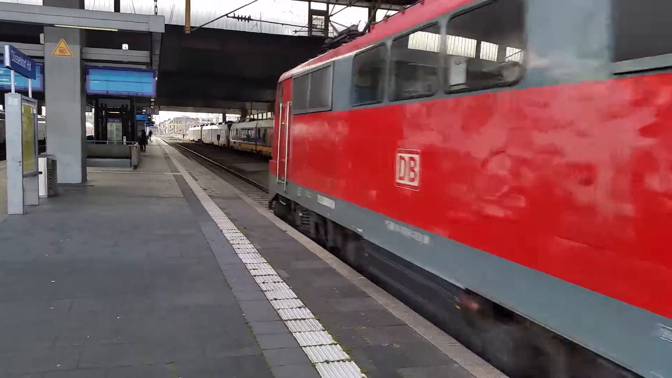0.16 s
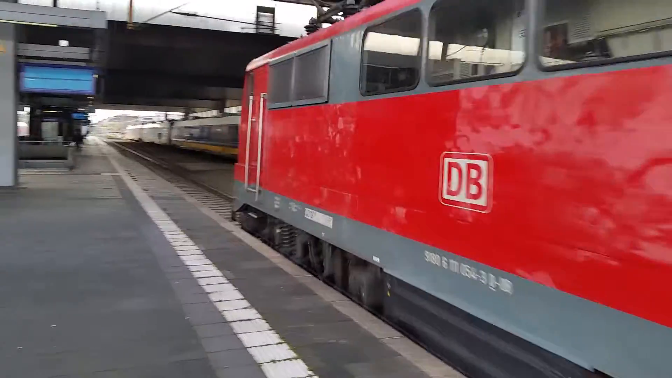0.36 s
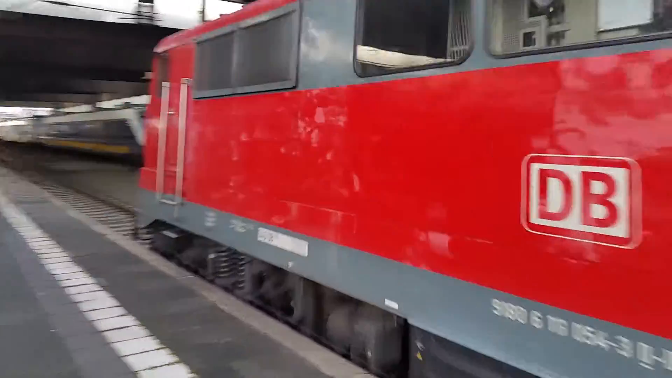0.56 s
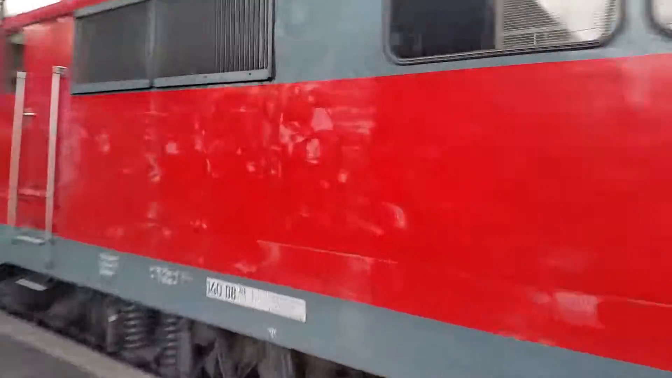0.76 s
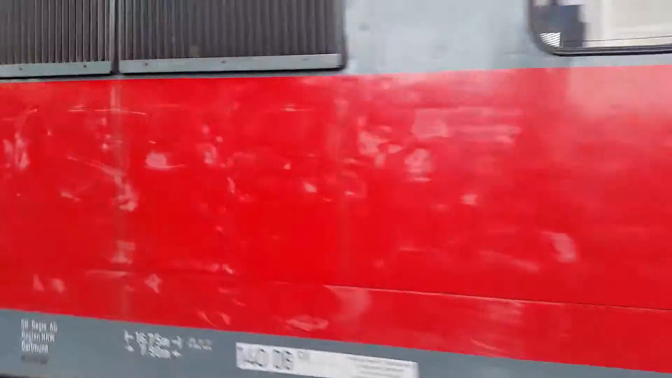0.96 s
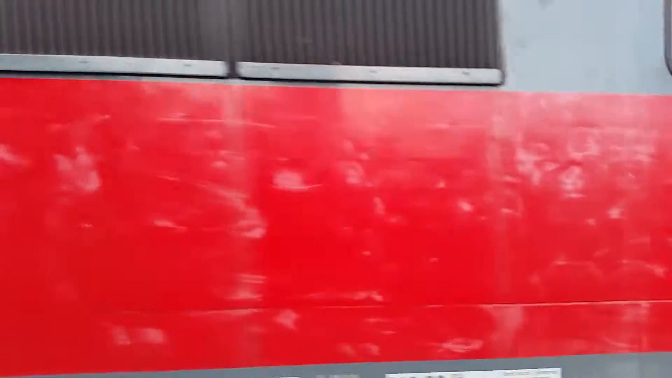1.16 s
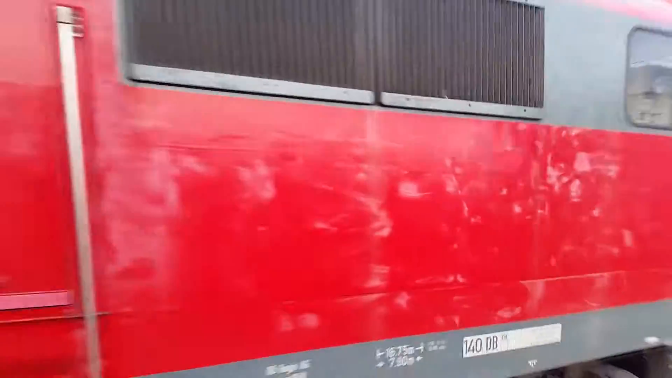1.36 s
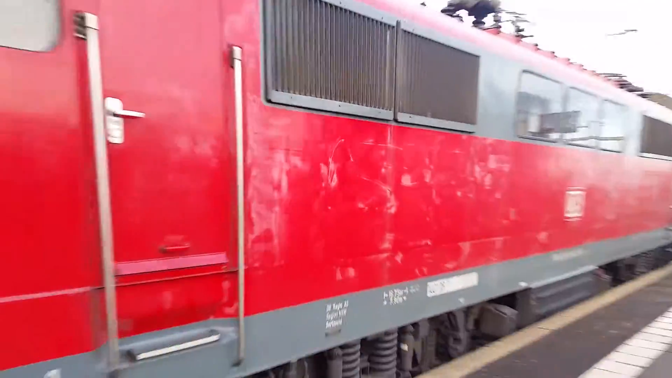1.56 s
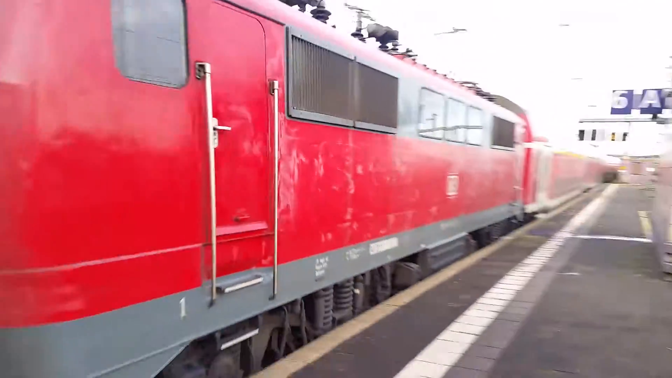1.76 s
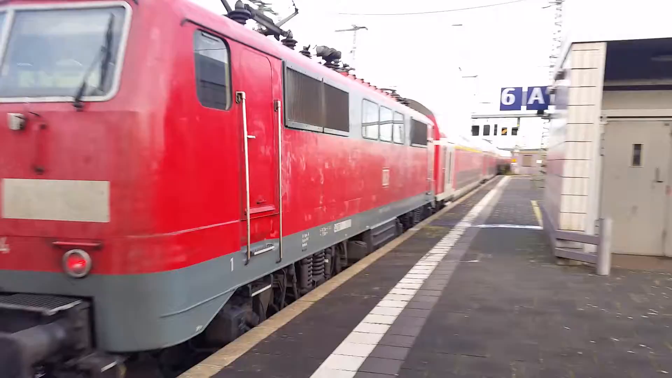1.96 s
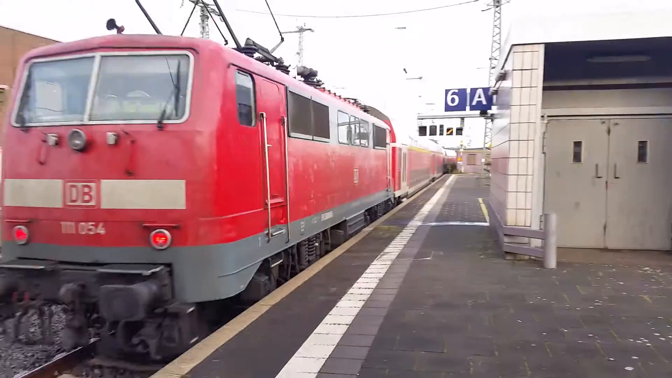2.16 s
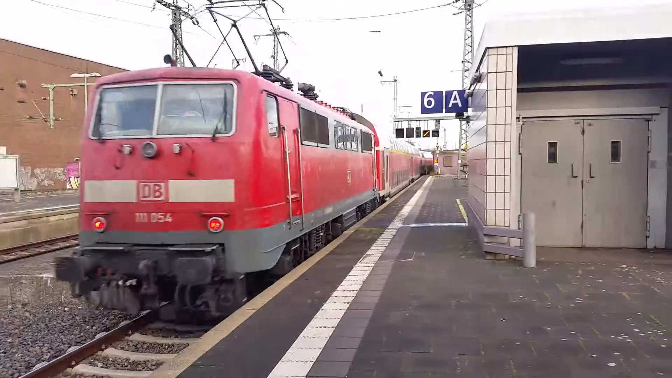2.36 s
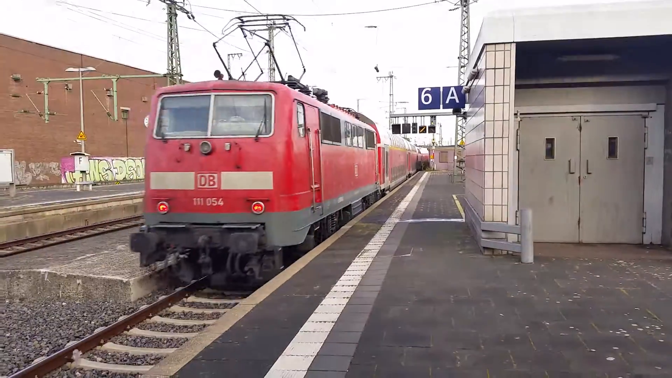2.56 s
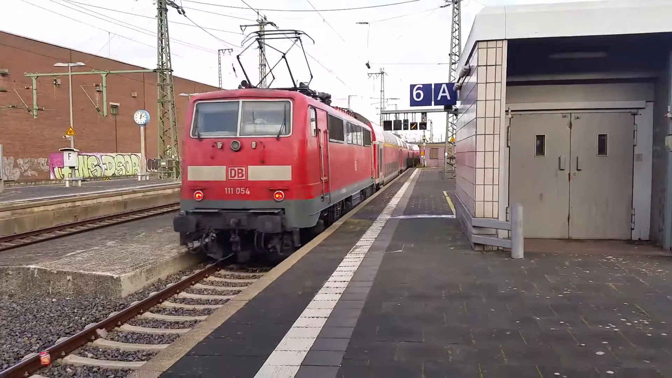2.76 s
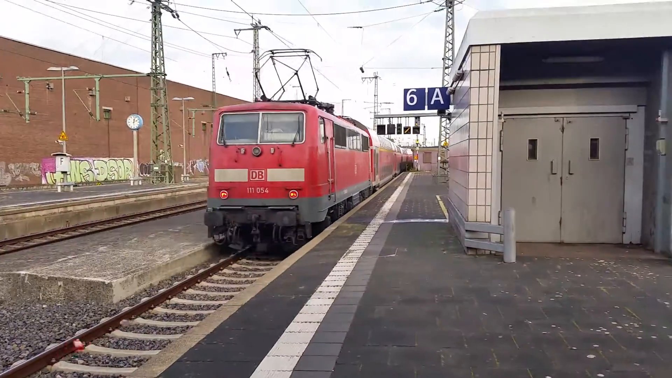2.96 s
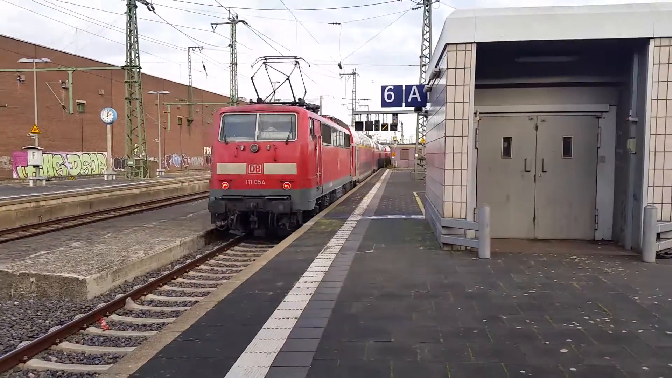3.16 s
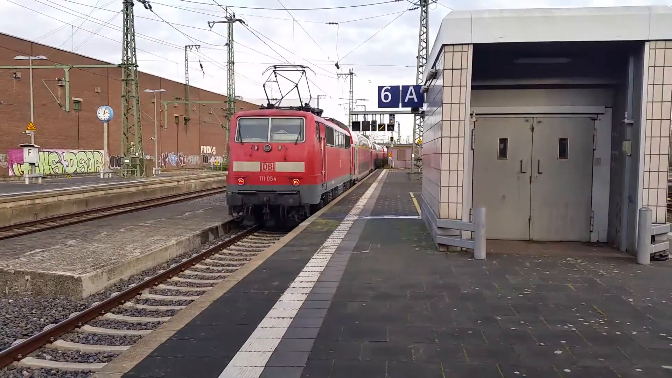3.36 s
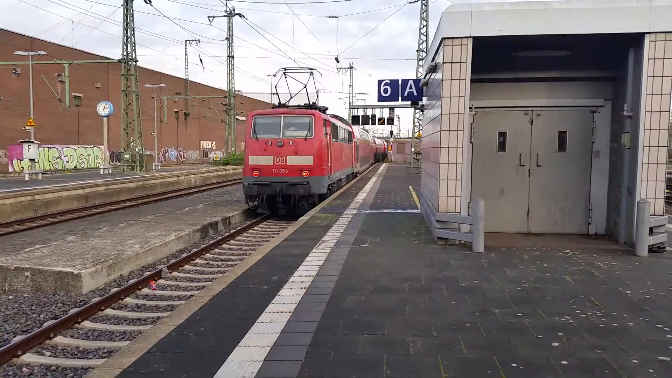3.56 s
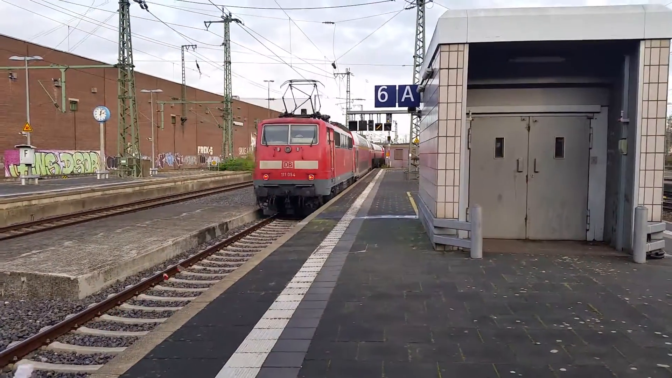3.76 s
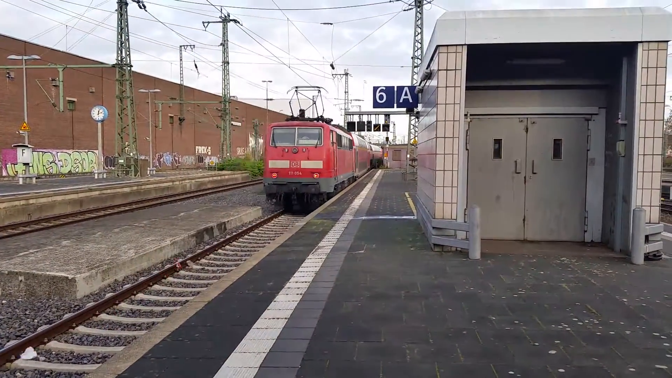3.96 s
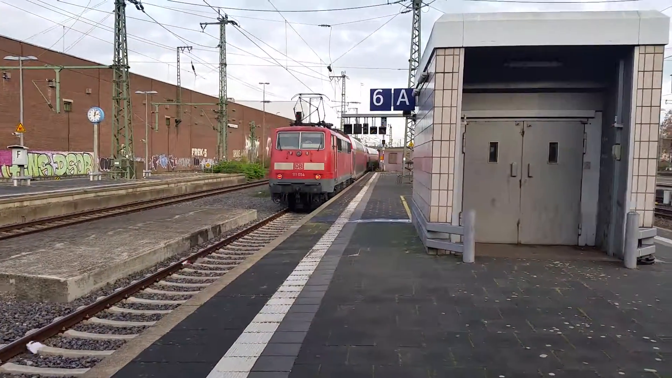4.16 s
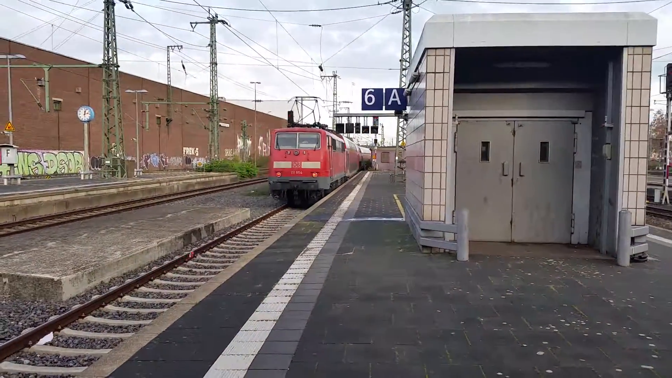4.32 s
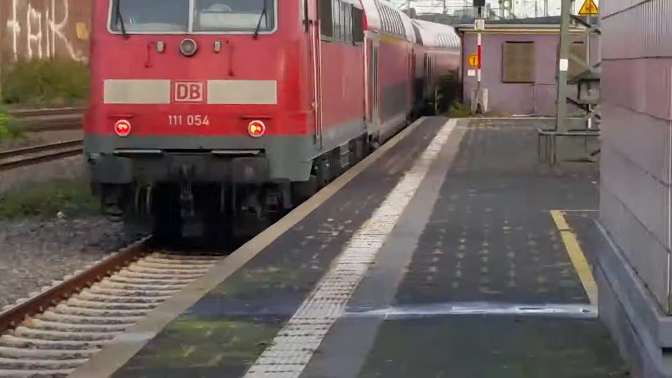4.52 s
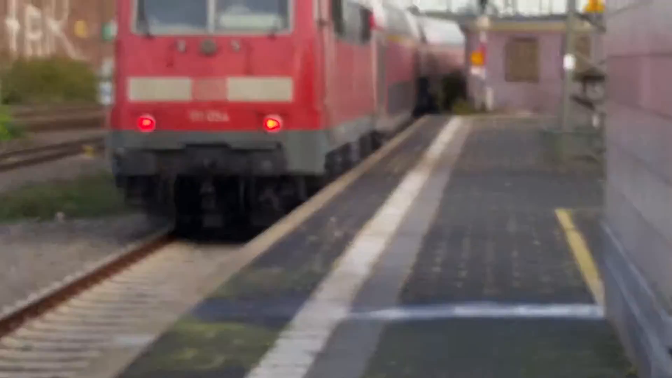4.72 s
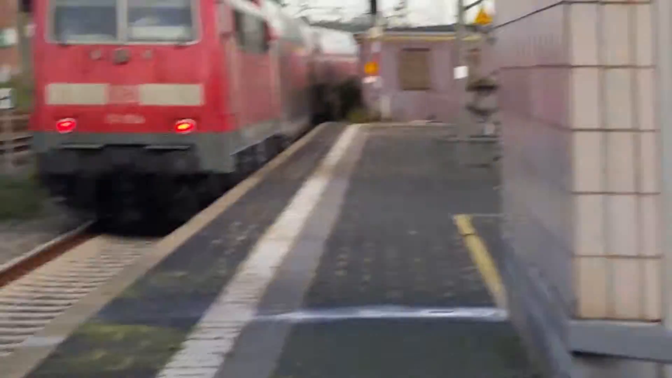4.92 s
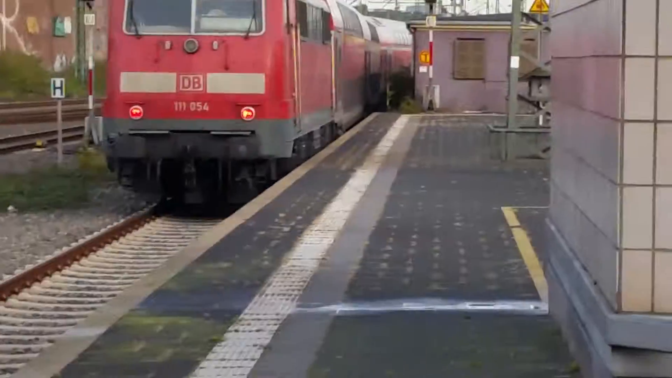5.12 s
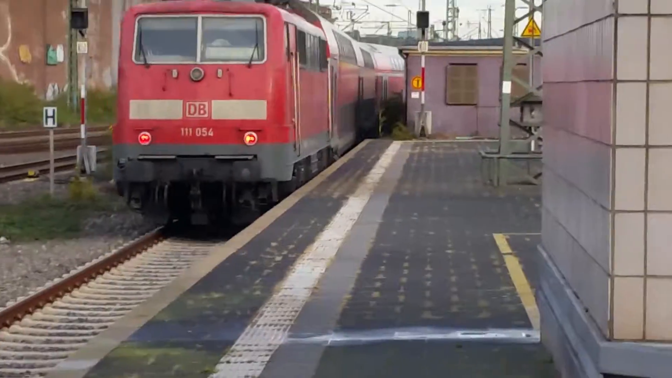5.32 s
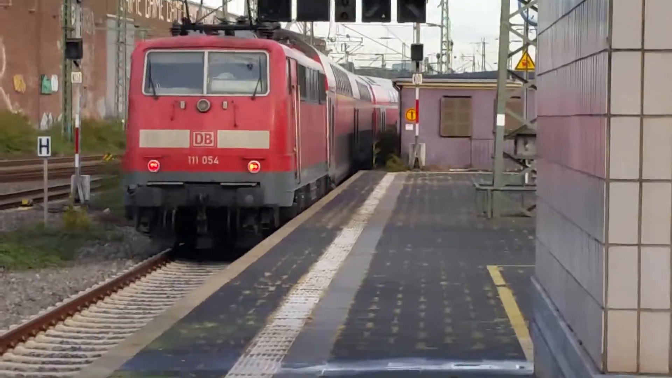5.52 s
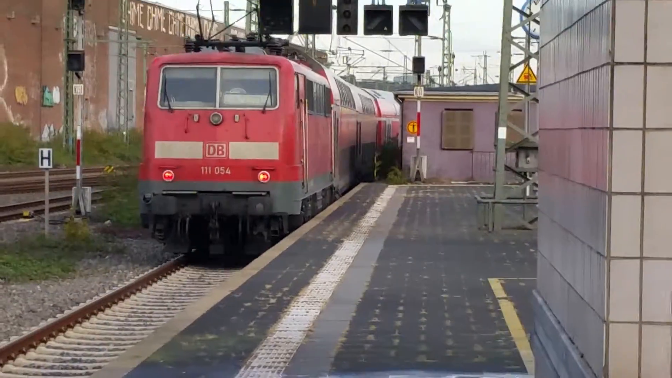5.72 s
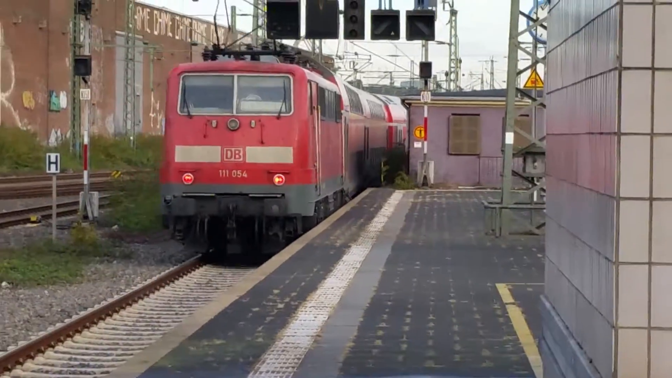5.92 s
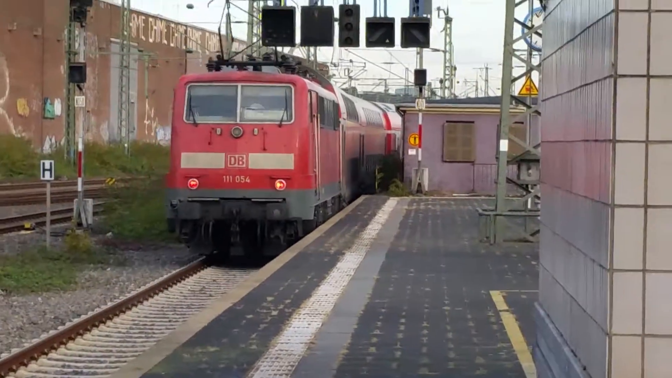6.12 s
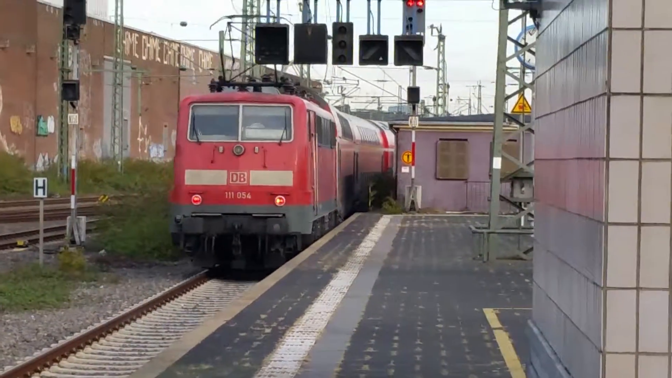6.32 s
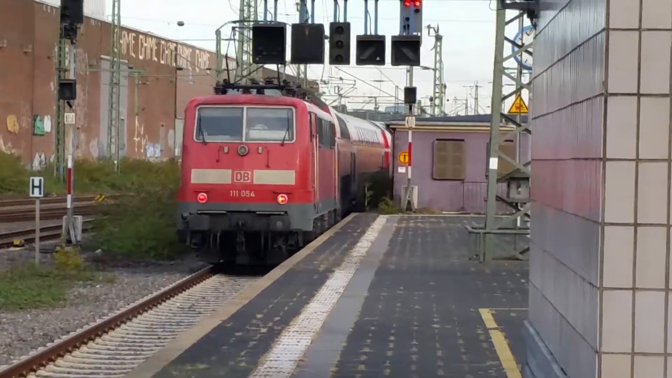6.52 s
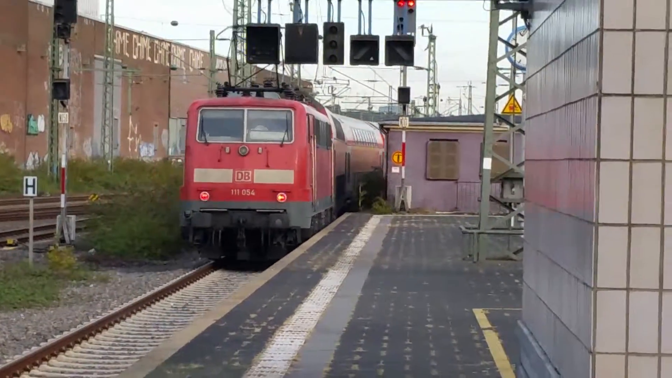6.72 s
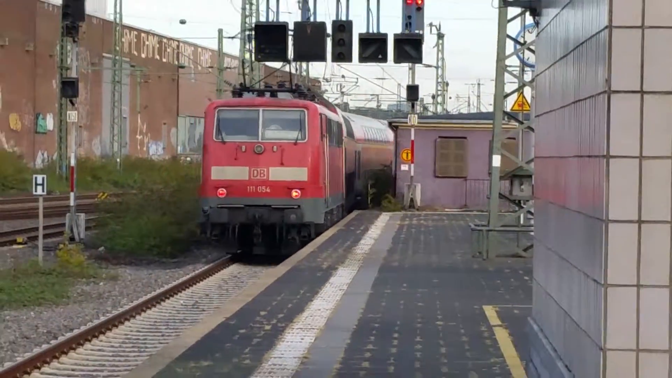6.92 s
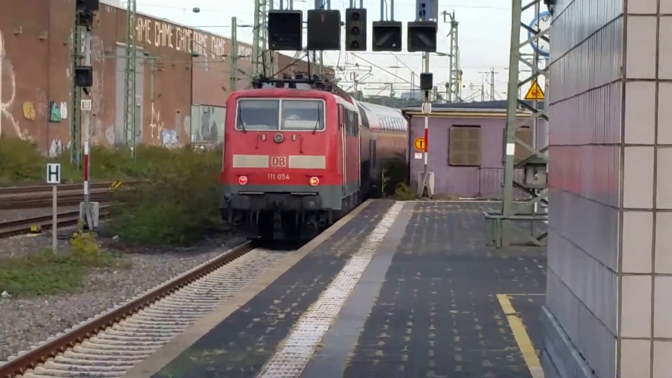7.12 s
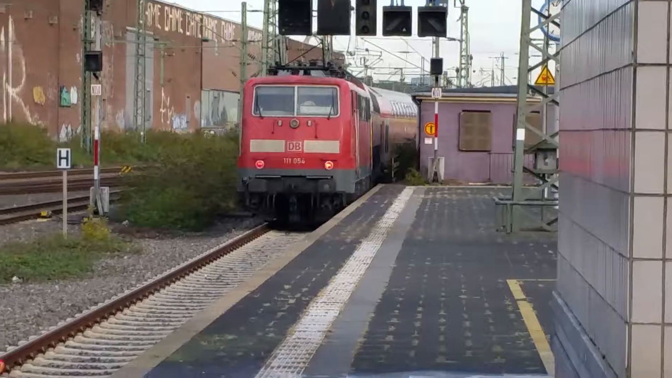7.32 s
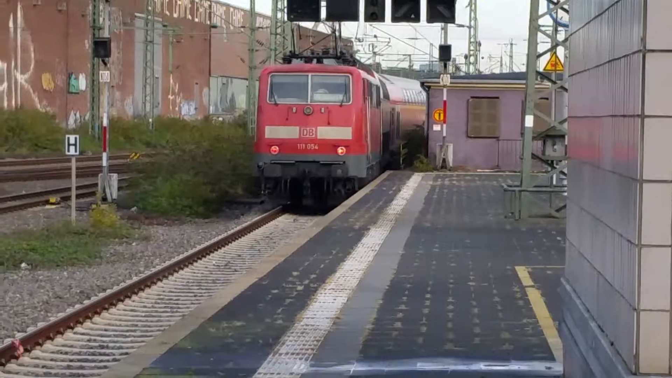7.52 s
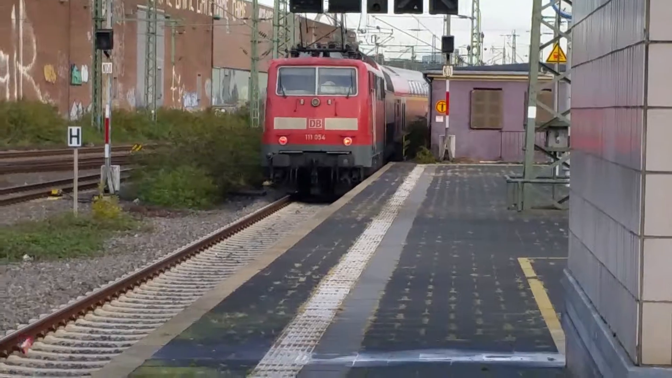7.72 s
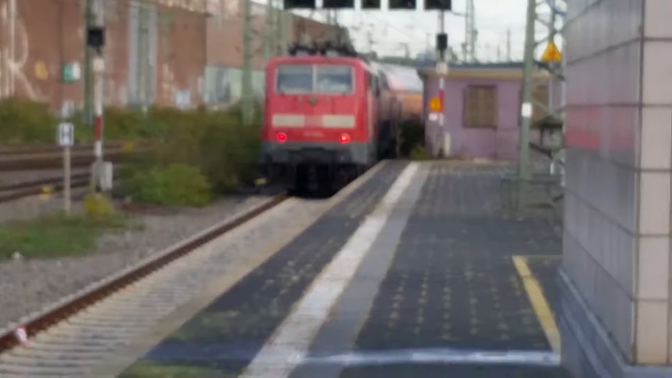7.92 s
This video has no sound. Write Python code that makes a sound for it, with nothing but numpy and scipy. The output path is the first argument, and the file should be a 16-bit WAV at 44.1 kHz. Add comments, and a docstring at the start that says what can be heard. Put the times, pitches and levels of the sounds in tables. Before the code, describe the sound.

An electric locomotive passes right beside a hand-held phone on a station platform. For the first two seconds it is loud: droning blowers, slightly sinking gear tones and rushing air over a low motor hum and wheel roar, with a double thump near 1 second. From about 2 seconds the train draws away and the roar gradually fades. A thin sizzle of wheels against rail peaks near 3 seconds, with faint high crackles, soft metallic ringing and a run of low wheel jolts between 2.7 and 4.4 seconds. The phone takes a light knock at 4.3 seconds and a sharp, loud one near 5 seconds, after which the train is quiet and muffled for about a second. Around 6 seconds, with a soft bump, the distant rumble returns, joined by a faint high electric whine until the end at about 8 seconds.

```python
"""An electric locomotive pushes its train along a platform, an arm's length from a hand-held phone.
First its gears and blowers go by in a rush of noise, over a motor hum and the roar of rough wheels shaking
bogies, rails and wheel discs, mirrored by the platform. As it recedes, faint crackles dot the treble,
flanges sizzle, wheels jolt and ring. Near 5 s the phone takes a sharp knock, and the train is quiet and
dull for a second. It comes back far off, with the electrics whining."""
import sys
import numpy as np
from scipy import signal
from scipy.fft import rfft, irfft, next_fast_len
from scipy.io import wavfile
from scipy.ndimage import uniform_filter1d, map_coordinates

SR = 44100
rng = np.random.default_rng(int(sys.argv[2]) if len(sys.argv) > 2 else 0)


def unload_wav(signal):
    """Save mono or channel-first audio to the path in sys.argv[1] as 16-bit WAV at rate SR, clipped to [-1, 1]."""
    wavfile.write(
        sys.argv[1],
        SR,
        np.round(np.clip(np.atleast_2d(signal).T, -1, 1) * 32767).astype(np.int16),
    )


N = 356328
TIME = np.arange(N) / SR
SIZE = next_fast_len(N, True)
FREQ = np.maximum(np.arange(SIZE // 2 + 1) * SR / SIZE, 1)
PAN = np.array([[.5], [-.5]])  # splits a left-minus-right difference between the channels

# stereo width of the train: (frequency [Hz], diffuse minus direct [dB])
STEREO_WIDTH = [(30, -7), (70, -25), (140, -17.5), (260, -21), (500, -10), (700, -13), (1030, -6.5),
                (1350, 0), (1900, -1), (2400, -5), (3000, -0.5), (15000, -3)]


def undb(db):
    """Decibels to gain."""
    return 10 ** (np.asarray(db) / 20)


def unit(x):
    """Scale to rms 1."""
    return x / np.sqrt(np.mean(x ** 2))


def curves(rows):
    """Envelopes from rows of (time [s], values), joined by straight lines."""
    s, *columns = np.transpose(rows)
    return [np.interp(TIME, s, c) for c in columns]


def colour(points):
    """An EQ curve through points of (frequency [Hz], level [dB])."""
    hz, db = np.transpose(points)
    return undb(np.interp(np.log(FREQ), np.log(hz), db))


def wave(spectrum):
    """A spectrum as a waveform."""
    return irfft(spectrum, SIZE)[..., :N]


def below(hz, order=16):
    """Low-pass gain at every frequency."""
    return 1 / np.sqrt(1 + (FREQ / hz) ** order)


def walk(rate_hz):
    """Smooth random modulation at rms 1: sample and hold, slewed twice."""
    hold = int(SR / rate_hz)
    held = rng.standard_normal(2000)[np.arange(N) // hold]
    return unit(uniform_filter1d(uniform_filter1d(held, hold), hold))


def swell(s, spread_s, order=2):
    """A bell-shaped envelope, 1 at its top; a higher order flattens the top."""
    return np.exp(-.5 * np.abs((TIME - s) / spread_s) ** order)


def add(out, s, sound):
    """Mix a sound in at time s."""
    i = int(s * SR)
    out[..., i:i + sound.shape[-1]] += sound[..., :N - i]


def ring(modes):
    """Decaying sines after a blow, peak 1."""
    t = TIME[:SR // 4]
    y = sum(undb(db - 60 * t / t60) * np.sin(2 * np.pi * hz * t) for hz, db, t60 in modes)
    return y / np.abs(y).max()


def tone(hz, db, waver, flutter_db=2):
    """A sine that flutters in level and wavers by a share of its pitch."""
    pitch = hz * (1 + waver * walk(30))
    return undb(db + flutter_db * walk(16)) * np.sin(2 * np.pi * np.cumsum(pitch) / SR)


def ports():
    """Each microphone port favours its own bands, and hears them earlier or later than the other."""
    # balance of the ports: (frequency [Hz], left minus right [dB])
    balance = [(100, 1.5), (260, 1.5), (440, -1), (610, 6), (1000, 0.5), (1450, 1.5), (1800, 1), (2200, -2),
               (3100, -7), (5200, -2.5), (7200, -2), (8600, -4), (11500, 6.5), (16000, 5)]
    # phase between the ports: (frequency [Hz], left lead [rad])
    phase_lead = [(100, -0.13), (300, -0.01), (500, 0.27), (700, -0.05), (1000, .5), (1200, 0.5),
                  (1400, 1.7), (1700, -0.53), (2000, -1), (2400, 0), (2800, 1.4), (3400, 2.5), (6500, 5)]
    lead = np.interp(FREQ, *np.transpose(phase_lead))
    return np.exp((np.log(colour(balance)) + 1j * lead) * PAN)


def noise_band(hz, width_hz):
    """A band of noise at rms 1 with the train's stereo width; its centre may glide."""
    a, b = wave(rfft(rng.standard_normal((2, 2, N)), SIZE) / (1 + (2 * FREQ / width_hz) ** 4))
    phase = 2 * np.pi * np.cumsum(hz * np.ones(N)) / SR
    mid, side = rfft(a * np.cos(phase) + b * np.sin(phase), SIZE)
    diffuse = side * colour(STEREO_WIDTH)
    return unit(wave(np.array([mid + diffuse, mid - diffuse]) * ports()))


def decades(abreast_s=0.73, speed_m_s=10.58, reach_m=16.07):
    """The locomotive's distance in powers of ten of the reach beyond which its noise thins out."""
    return np.log10(np.hypot(1, speed_m_s * (TIME - abreast_s) / reach_m))


def whine(s=7.22, spread_s=0.95, base_hz=165.75):
    """Far off, the traction electrics whine on a few high multiples of one steady pitch."""
    # partials of the whine: (multiple of the base pitch)
    multiples = (16, 18, 19, 20, 21, 25)
    # strength of each partial: (level [dB])
    levels = [-61, -62, -52.5, -66, -58, -66]
    partials = sum(tone(k * base_hz, db, waver=0.0006, flutter_db=0.3)
                   for k, db in zip(multiples, levels))
    return swell(s, spread_s, order=4) * partials


def motor_hum(db_per_decade=14):
    """The motor hum carries far, fading slowly with distance."""
    # motor tones: (pitch [Hz], level abreast [dB])
    partials = [(140, -29), (233, -30), (458, -42.5)]
    return sum(tone(hz, db - db_per_decade * decades(), waver=0.01117) for hz, db in partials)


def crackles(trim_db=-9, edge_hz=3600, spatter_s=(1.7, 4.25), spatter_db=-39, scatter_db=2, count=40):
    """Short, thin, grainy bursts, each with a high ping, and a random spatter of smaller ones."""
    # the main crackles: (time [s], length [s], relative level [dB], left minus right [dB])
    accents = [(.349, 0.008, -30, 10), (1.763, .008, -29, -1), (1.835, .008, -28, -3),
               (2.257, .008, -26, 10), (2.326, 0.012, -35, -9.5), (2.437, .008, -30.5, -4),
               (3.005, .02, -29, 3), (3.095, 0.0072, -25, 8), (3.123, .005, -28, 5), (3.413, 0.011, -29, 4),
               (3.651, 0.0096, -26, 4), (3.685, .012, -33, -1), (3.926, .03, -35, 4),
               (4.053, 0.015, -24.5, -4), (4.12, .006, -36, 2), (4.175, .024, -33, 3),
               (4.233, .016, -35, 2), (4.316, 0.014, -33, 2), (4.514, .005, -35, -1), (4.81, .02, -42, 2),
               (5.045, .018, -41, -1), (6.69, .025, -45, 3), (6.857, .006, -47, 2), (7.443, .005, -47, 2)]
    out, t = np.zeros((2, N)), TIME[:SR // 20]
    times, lengths = rng.uniform(*spatter_s, count), rng.uniform(.002, .012, count)
    offsets_db, pans_db = scatter_db * rng.standard_normal((count, 2)).T
    spatter = zip(times, lengths, spatter_db + offsets_db, pans_db)
    for s, length_s, db, pan_db in [*accents, *spatter]:
        envelope = np.sin(np.pi * np.minimum(t / length_s, 1))
        burst = rng.laplace(size=(2, len(t))) / 2 * envelope
        ping = signal.lfilter(*signal.iirpeak(rng.uniform(9000, 15000), Q=8, fs=SR), burst)
        add(out, s, (burst + ping) * undb(db + trim_db + PAN * pan_db))
    return wave(rfft(out, SIZE) * (1 - below(edge_hz, order=8)))


def flange_sizzle():
    """Flanges rub the rail as the locomotive draws away, once at length and in a few short scrapes."""
    # flange rubs: (peak time [s], spread [s], centre [Hz], width [Hz], level [dB])
    rubs = [(2.8, 0.69, 5300, 850, -45.5), (2.85, .012, 3700, 1300, -37), (3.1, .008, 4000, 1500, -35),
            (7.3, 0.023, 4300, 2600, -47)]
    return sum(undb(db) * noise_band(hz, width_hz) * swell(s, spread_s)
               for s, spread_s, hz, width_hz, db in rubs)


def wheel_ring(from_s=2.9, rise_s=.3, db_per_decade=10.5, flare_db=2):
    """Steel wheels ring in a few bands that flare and fade, heard once the locomotive has gone by."""
    # wheel resonances: (centre [Hz], width [Hz], level before distance loss [dB])
    bands = [(1696, 170, -41.5), (2260, 240, -46), (2470, 180, -47.5)]
    fade_in = (1 + np.tanh((TIME - from_s) / rise_s)) / 2
    loss_db = db_per_decade * decades()
    return fade_in * sum(undb(db - loss_db + flare_db * walk(9)) * noise_band(hz, width_hz)
                         for hz, width_hz, db in bands)


def rushes():
    """Bands of rushing noise, from rumble to hiss, swell and fade as the locomotive passes; some glide."""
    # whooshes: (peak time [s], spread [s], centre [Hz], glide [Hz/s], width [Hz], level [dB])
    whooshes = [(.15, 0.24, 92.1, 0, 40, -24), (.66, 0.19, 535, 190, 55, -25),
                (.75, 0.71, 213.8, 0, 22, -23.5), (1.0, 0.66, 458.7, -12, 22, -27),
                (1.25, .15, 138, -0.5, 36, -22), (1.28, 0.2, 820, -120, 150, -29.5),
                (1.5, .45, 3497, -0.5, 1310, -35.5), (1.72, 0.26, 2685, -700, 260, -34.5),
                (1.85, 0.11, 269.8, 0, 80, -18.5)]
    return sum(undb(db) * noise_band(hz + glide * (TIME - s), width_hz) * swell(s, spread_s)
               for s, spread_s, hz, glide, width_hz, db in whooshes)


def blowers(s=0.97, spread_s=0.62):
    """The blowers drone while the locomotive's side is abreast."""
    # blower tones: (pitch [Hz], level abreast [dB])
    drones = [(214, -15), (352, -23.5), (457, -23.5)]
    return swell(s, spread_s, order=4) * sum(tone(hz, db, waver=0.00786) for hz, db in drones)


def gears(sag_per_s=.08, waver=0.01896):
    """Each bogie's gears whine as it goes by, sinking by a share of their pitch."""
    # gear tones: (peak time [s], spread [s], pitch at the peak [Hz], level [dB])
    gear_tones = [(0.285, .36, 171, -16.5), (0.359, 0.21, 470, -24), (0.202, 0.23, 870, -29),
                  (0.239, 0.22, 960, -25.5), (1.5, .2, 171, -19.5), (1.3, 0.23, 850, -27),
                  (1.3, 0.32, 1000, -27)]
    return sum(swell(s, spread_s, order=4) * tone(hz * (1 - sag_per_s * (TIME - s)), db, waver)
               for s, spread_s, hz, db in gear_tones)


def jolts(scatter=0.06):
    """A wheel drops on an uneven spot and its bogie booms, tuned a little differently every time."""
    # wheel drops: (time [s], level [dB])
    drops = [(.905, -12), (0.935, -10), (2.678, -12), (2.78, -13), (3.265, -9), (3.762, -11), (3.851, -8.5),
             (4.03, -15), (4.31, -9), (4.41, -13), (6.229, -26), (7.332, -22)]
    # modes of a bogie: (frequency [Hz], relative level [dB], t60 [s])
    bogie_modes = [(72, -14, 0.091), (138, 16.5, 0.083), (205, 6, 0.21), (308, 2.5, 0.13),
                   (458, -31, 0.037), (815, -26, .04)]
    out = np.zeros(N)
    for s, db in drops:
        detune = 1 + scatter * rng.standard_normal(len(bogie_modes))
        modes = [(hz * d, mode_db, t60) for (hz, mode_db, t60), d in zip(bogie_modes, detune)]
        add(out, s, undb(db) * ring(modes))
    return out


def tread(grains_db=-12, count=5000):
    """Wheel on rail: smooth roughness and hundreds of tiny impacts a second."""
    impacts = np.zeros(N)
    impacts[rng.integers(0, N, count)] = rng.laplace(size=count)
    return rng.standard_normal(N) + undb(grains_db) * unit(impacts)


def small_modes(count=220, depth_db=.8):
    """Countless small modes and nearby reflections ripple the spectrum."""
    ripple_db = depth_db * rng.standard_normal(count)
    return colour(np.column_stack([np.geomspace(200, 12000, count), ripple_db]))


def rolling_levels(pass_spread_s=.33):
    """Rumble, roar and hiss in dB: they fall with distance and ride on each bogie and each swell."""
    # the two bogies going by: (time [s], extra roar [dB], extra hiss [dB])
    bogie_passes = [(0.202, 3.5, 0), (1.32, 3.5, 4.5)]
    # swells of the receding train: (time [s], spread [s], rumble [dB], roar [dB], hiss [dB])
    swells = [(2.7, 0.25, 1, 1.5, 2), (3.25, 0.46, 2.5, 1.9, 2.1), (4.6, 0.42, 0.1, -1, 0.5),
              (7.3, 0.65, 0.8, -0.5, 0.6)]
    rumble = -14 - 23.2 * decades()
    roar = -24.5 - 18.3 * decades()
    hiss = -39 - 18.1 * decades()
    for s, roar_db, hiss_db in bogie_passes:
        near = swell(s, pass_spread_s)
        roar, hiss = roar + roar_db * near, hiss + hiss_db * near
    for s, spread_s, rumble_db, roar_db, hiss_db in swells:
        up = swell(s, spread_s)
        rumble, roar, hiss = rumble + rumble_db * up, roar + roar_db * up, hiss + hiss_db * up
    return rumble, roar, hiss


def rolling(rumble_top_hz=520, roar_top_hz=2700, shudder_db=.5, flutter_db=0.88):
    """The treads drive the resonances of the running gear; the colour changes as the train draws away."""
    # rolling noise beside the locomotive, behind it and far off: (frequency [Hz], relative level [dB])
    beside = [(30, -23), (75, -9.5), (115, -10), (185, -1.5), (260, -7), (350, -9.5), (470, -11),
              (600, -21), (950, -18.5), (1450, -25.5), (2600, -27), (4700, -35), (8200, -46), (15000, -52)]
    behind = [(30, -18), (65, -4.5), (125, -1), (230, -1.5), (410, -12), (560, -18), (950, -12),
              (1420, -22.5), (2400, -26.5), (3300, -27.5), (5600, -31.5), (8000, -41.5), (13000, -48.5),
              (15500, -52)]
    far = [(30, -10), (70, -0.5), (103, -4.5), (150, 0), (270, -3.5), (490, -14.5), (960, -13.5),
           (1330, -22), (2400, -25.5), (3800, -30), (6000, -39), (7000, -45.5), (7500, -53), (8100, -52.5),
           (9000, -66), (12000, -59.5), (15500, -49)]
    # crossfade of those colours: (time [s], perspective [0 beside, 1 behind, 2 far])
    crossfade = [(1.6, 0), (2.3, 0.48), (4.4, 1.34), (5.3, 2)]
    # peaks and valleys of bogies, rails and wheel discs: (centre [Hz], width [Hz], gain [dB])
    resonances = [(78.5, 35, 2.5), (133, 89, 2), (237, 25, 0), (304, 102, 4), (446, 13, 2), (519, 72, -4.5),
                  (710, 230, 0.5), (1020, 79, 1.5), (1410, 210, -1.5), (1714, 410, 2), (1964, 81, -1.5),
                  (2280, 130, 2), (2980, 590, -3), (5630, 1400, 2.5)]
    # echoes widen the train once it has gone by: (frequency [Hz], extra diffuse level [dB])
    widening = [(140, -2), (300, 0.5), (500, 10), (700, 2.5), (1000, 0.5), (1800, 2.5), (3000, -2)]
    rumble, roar, hiss = rolling_levels()
    perspective, = curves(crossfade)
    body = undb(sum(db / (1 + (2 * (FREQ - hz) / width) ** 2) for hz, width, db in resonances))
    tint = body * ports()
    mid, side = rfft(tread(), SIZE), rfft(tread(), SIZE) * colour(STEREO_WIDTH)
    lows, lows_and_mids = below(rumble_top_hz), below(roar_top_hz)
    bands = [(lows, undb(rumble + shudder_db * walk(18))),
             (lows_and_mids * np.sqrt(1 - lows ** 2), undb(roar + flutter_db * walk(21.82))),
             (np.sqrt(1 - lows_and_mids ** 2), undb(hiss + flutter_db * walk(25)))]
    out = 0
    for k, eq in enumerate([beside, behind, far]):
        share = np.maximum(1 - np.abs(perspective - k), 0)
        diffuse = side * colour(widening) if k else side
        spectrum = np.array([mid + diffuse, mid - diffuse]) * tint * colour(eq) * small_modes()
        for band, gain in bands:
            layer = wave(spectrum * band)
            out = out + layer * (share * gain / layer.mean(axis=0).std())
    return out


def platform(direct, edge_hz=620, top_hz=4200):
    """The platform mirrors the running gear; the lag grows with distance, so the noise phases down."""
    # bounce off the platform: (time [s], lag [s], left share, right share)
    reflection = [(.8, 0.001, 0, 0), (1.35, 0.001105, 0.27, 0.16), (1.8, 0.0011, 0.075, 0.15),
                  (2.2, 0.00134, 0.03, 0.057), (2.7, 0.00132, 0.039, 0.21), (3.5, .00138, 0.0056, 0.051),
                  (4.1, .00142, 0, 0)]
    lag_s, *shares = curves(reflection)
    bounced = wave(rfft(direct, SIZE) * (1 - below(edge_hz, order=8)) * below(top_hz, order=8))
    out = []
    for channel, bounce, share in zip(direct, bounced, shares):
        delayed = map_coordinates(bounce, [(TIME - lag_s) * SR], order=3, mode="mirror")
        out.append((channel + share * delayed) / np.sqrt(1 + share ** 2 / 2))
    return np.array(out)


def knocks(lag_s=0.00089, stiff_hz=70, thud_left_db=4):
    """A hard contact clicks, then the phone's stiff case gives a short thud; softer ones are duller."""
    # knocks on the phone: (time [s], thud [dB], click [dB], click top [Hz], click left minus right [dB])
    hits = [(4.304, -11.5, -15, 4800, 1), (4.956, 6, -6.5, 8600, 14.5), (5.341, -59.5, -28.5, 4220, 11),
            (6.128, -15, -46, 2000, -4)]
    # modes of the case: (frequency [Hz], relative level [dB], t60 [s])
    case_modes = [(184, 26.5, 0.032), (259, 10, 0.14), (315, 31.5, 0.016), (424, 13, 0.013),
                  (670, 18.5, 0.016), (2350, 1, .006), (3700, 2, .008)]
    # colour of the contact click: (frequency [Hz], relative level [dB])
    click_eq = [(300, 12), (1300, -5), (2300, 2), (2850, -3), (3700, 7), (5000, -10), (8200, -14),
                (9200, -35), (16000, -50)]
    thuds, clicks = np.zeros(N), 0
    for s, thud_db, click_db, top_hz, pan_db in hits:
        click = colour(click_eq) * below(top_hz)
        delay = np.exp(-2j * np.pi * FREQ * s)
        clicks = clicks + undb(click_db + PAN * pan_db) * click / click.mean() * delay
        add(thuds, s + lag_s, -undb(thud_db) * ring(case_modes))
    tight_thuds = wave(rfft(thuds, SIZE) * (1 - below(stiff_hz, order=6)))
    return tight_thuds * undb(PAN * thud_left_db) + wave(clicks)


def dip(start_s=4.924, depth_db=-17, attack_s=0.16, dull_db_per_s=-15):
    """Level and treble in dB: at the hardest knock both drop for a second, the treble further."""
    since = np.maximum(TIME - start_s, 0)

    def held(hold_s, release_s):
        return (1 - np.tanh((since - hold_s) / (2 * release_s))) / 2

    dip_db = depth_db * (1 - np.exp(-since / attack_s)) * held(hold_s=1.07, release_s=0.1)
    dull_db = dull_db_per_s * since * held(hold_s=1.08, release_s=0.13)
    return dip_db, dull_db


def scene(dull_hz=4000, hum_dip_share=0.55):
    """The train dips and dulls after the knock, its hum sinks less; crackles and knocks stay on top."""
    train = platform(rolling()) + gears() + blowers() + rushes()
    train = train + flange_sizzle() + whine() + wheel_ring() + jolts()
    dip_db, dull_db = dip()
    lows = wave(rfft(train, SIZE) * below(dull_hz, order=10))
    dulled = lows + undb(dull_db) * (train - lows)
    return undb(dip_db) * dulled + undb(hum_dip_share * dip_db) * motor_hum() + crackles() + knocks()


def record(dry, bottom_hz=22, top_hz=15850):
    """The phone drops the deepest bass, rounds the loudest peaks and cuts the top."""
    trimmed = signal.sosfilt(signal.butter(2, bottom_hz, "high", fs=SR, output="sos"), dry)
    rounded = trimmed / (1 + trimmed ** 4) ** (1 / 4)
    return signal.sosfilt(signal.ellip(10, .1, 80, top_hz, fs=SR, output="sos"), rounded)


dry = scene()
out = record(dry)
unload_wav(out)
```